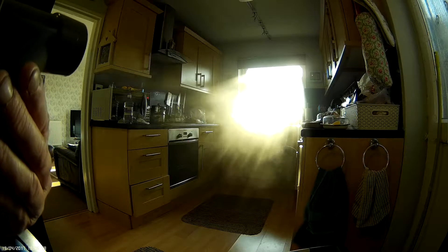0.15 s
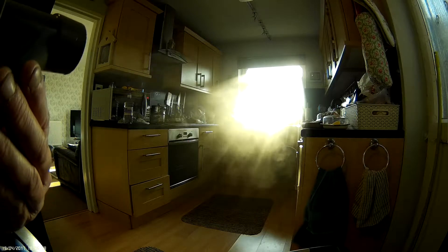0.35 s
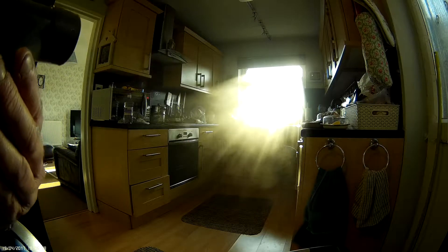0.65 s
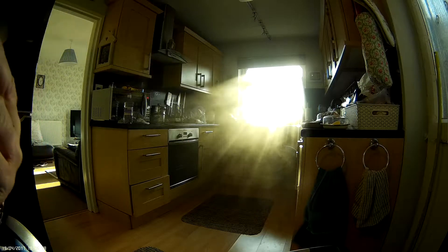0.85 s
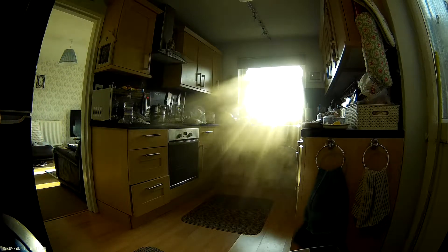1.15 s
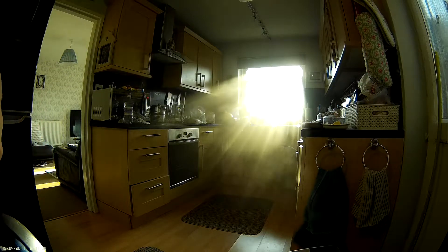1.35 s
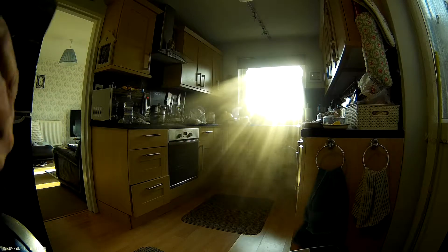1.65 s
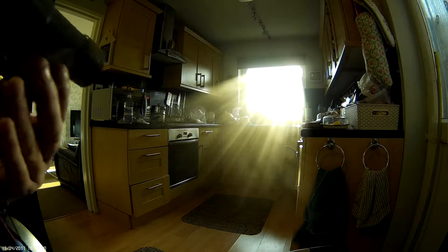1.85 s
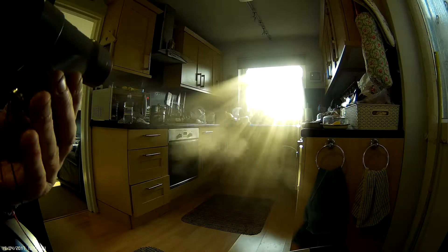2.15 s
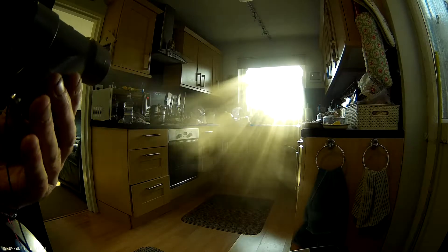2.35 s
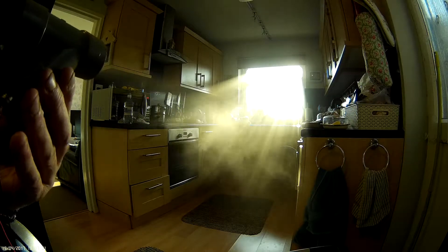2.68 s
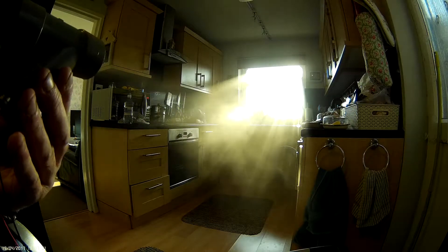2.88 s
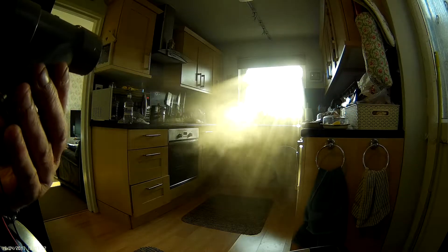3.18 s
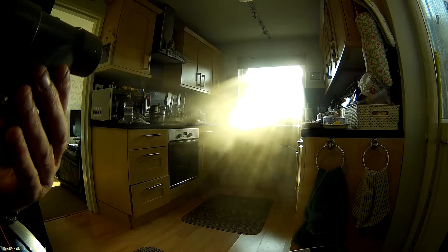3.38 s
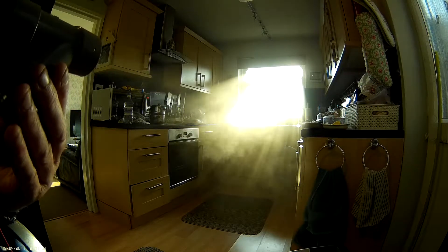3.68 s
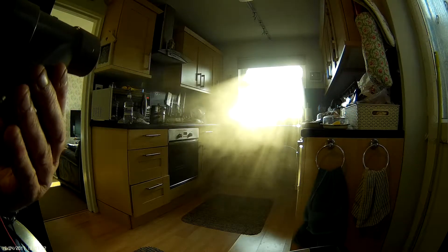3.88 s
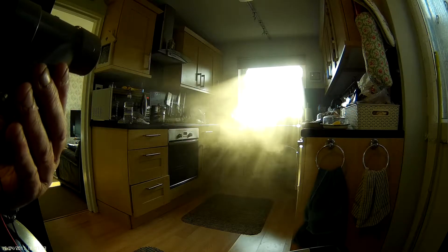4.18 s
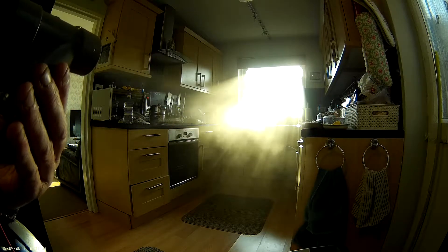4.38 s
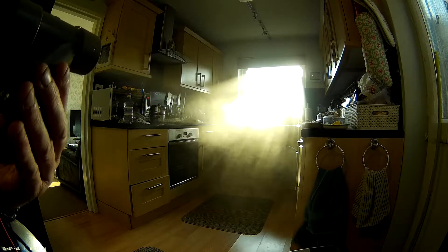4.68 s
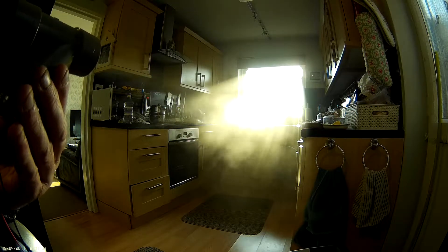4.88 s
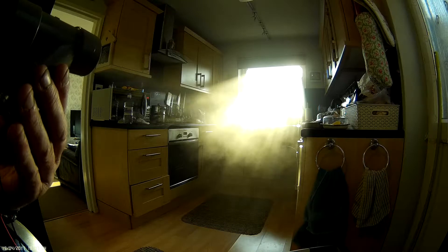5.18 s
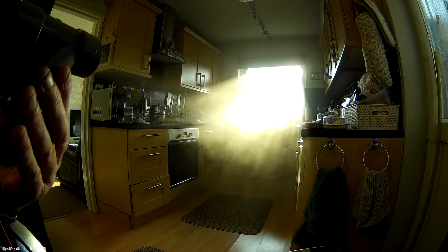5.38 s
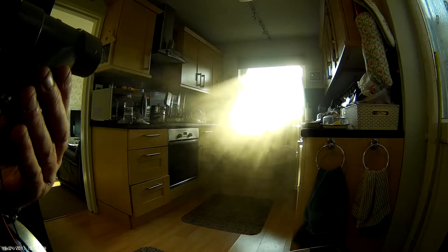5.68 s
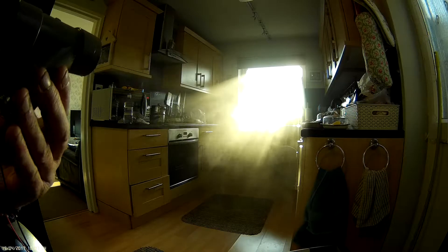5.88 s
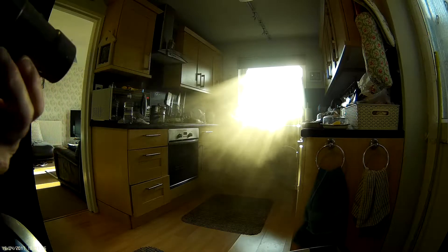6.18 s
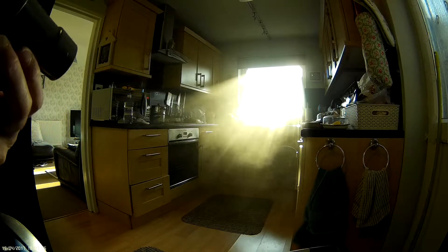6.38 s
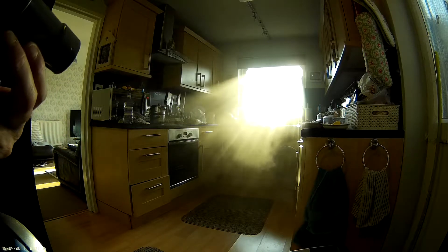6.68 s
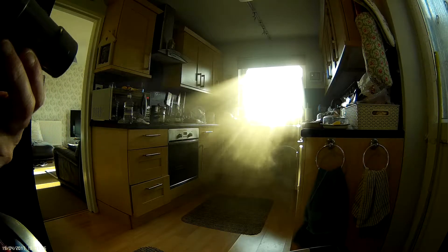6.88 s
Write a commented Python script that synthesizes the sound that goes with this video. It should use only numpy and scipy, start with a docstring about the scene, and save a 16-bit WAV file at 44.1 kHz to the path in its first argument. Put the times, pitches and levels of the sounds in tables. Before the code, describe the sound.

Close hairdryer whoosh and motor whine, briefly dipping, dropping deeper, then winding down to a near-quiet lull with switch clicks before surging back up.

```python
"""A hand-held hairdryer blows in a kitchen, close to the microphone, and is drawn back beside it at first.
Its power is let go three times: a brief dip, a deeper drop, then a long coast almost to rest and a restart.
Air is coloured noise that follows the fan speed; the seven-bladed fan and whine are harmonics of the shaft.
The mains hum while power is on; the switch and plastic handle click as noise bursts through resonances.
Near surfaces echo the air, a short room tail follows fan and handle, and a quiet room lies beneath."""
import sys
import numpy as np
from scipy import signal
from scipy.fft import rfft, irfft, next_fast_len
from scipy.io import wavfile
from scipy.ndimage import map_coordinates

SR = 44100
rng = np.random.default_rng(int(sys.argv[2]) if len(sys.argv) > 2 else 0)


def to_wav(sig):
    """Store sig (one row per channel, or 1-D mono) as 16-bit WAV at the path in sys.argv[1].

    Samples outside -1..1 are clipped; the rate is SR.
    """
    pcm = np.clip(np.atleast_2d(sig), -1, 1) * 32767
    pcm = np.round(pcm).astype(np.int16)
    wavfile.write(sys.argv[1], SR, pcm.T)  # frames by channels


N = 310464
TIME = np.arange(N) / SR  # s


def amp(db):
    """Decibels to gain."""
    return 10 ** (np.asarray(db) / 20)


def unit(x):
    """Scale to rms 1."""
    return x / np.sqrt(np.mean(x ** 2) + 1e-20)


def along(points, hz):
    """Read (frequency [Hz], value) points on a log frequency axis."""
    point_hz, values = np.transpose(points)
    return np.interp(np.log(hz + 1), np.log(point_hz + 1), values)


def curve(rows):
    """Read (time [s], value) points at every sample, holding the end values."""
    times, values = np.transpose(rows)
    return np.interp(TIME, times, values)


def wobble(rate):
    """A smooth random curve with rate knots a second."""
    knots = rng.standard_normal(int(N * rate / SR) + 4)
    return map_coordinates(knots, [TIME * rate])


def filtered(x, response):
    """Pass x through a complex response of frequency."""
    size = next_fast_len(len(x) + SR // 4)
    spectrum = rfft(x, size) * response(np.fft.rfftfreq(size, 1 / SR))
    return irfft(spectrum, size)[:len(x)]


def resonance(f, hz, width):
    """Response of one damped mode, with its width in Hz."""
    return 1j * f * width / (hz * hz - f * f + 1j * f * width)


def noise(spectrum):
    """Coloured noise of rms 1."""
    return unit(filtered(rng.standard_normal(N), lambda f: amp(along(spectrum, f))))


def sounding(hz, width):
    """A resonance kept sounding by turbulence or friction, rms 1."""
    return unit(filtered(rng.standard_normal(N), lambda f: resonance(f, hz, width) ** 2))


def soundings(modes):
    """Sum of sounding resonances at their own levels."""
    return sum(amp(db) * sounding(hz, width) for hz, width, db in modes)


def tone(angle, multiple, rough):
    """A shaft harmonic of rms 1; uneven inflow shakes its strength and phase."""
    shake = 1 + rough * (wobble(55) + 1j * wobble(55))
    return unit(np.real(shake * np.exp(1j * round(multiple) * angle)))


def above(speed, threshold, steepness):
    """A soft gate that opens as the speed passes a threshold."""
    return 1 / (1 + (threshold / speed) ** steepness)


def swells(rows):
    """Gain of bell-shaped swells."""
    return sum(amp(db) * np.exp(-((TIME - middle) / half) ** 2) for middle, half, db in rows)


# Spells with the power on: (on time [s], off time [s], top speed [turns/s],
# spin-up time constant [s], mains hum level [dB])
POWER_RUNS = [(-2, 1.356, 291.3, .13, -46.5), (1.42, 3.618, 276.6, .131, -54.5),
              (3.914, 5.296, 291.9, .127, -55.5), (6.642, 8, 291.3, .29, -59)]


def shaft_speed():
    """Turns a second: the motor pulls towards its top speed while on; bearings and air slow it while off."""
    bearing_drag = 1.884  # share of speed lost a second
    air_drag = 0.0152  # share of speed lost a turn
    speed = np.zeros(N)
    for on, off, top, spin_up, _ in POWER_RUNS:
        start = np.interp(on, TIME, speed)
        time_on = np.clip(TIME - on, 0, off - on)
        driven = top + (start - top) * np.exp(-time_on / spin_up)
        left = np.exp(-bearing_drag * np.maximum(TIME - off, 0))
        coasting = driven * left / (1 + driven * (1 - left) * air_drag / bearing_drag)
        speed = np.where(TIME < on, speed, coasting)
    return speed


def surge():
    """The air overshoots after each switch-on: a hump from 0 to 1 and back."""
    peak_s = 0.31  # after switch-on
    ages = [np.maximum(TIME - on, 0) / peak_s for on, *_ in POWER_RUNS]
    return sum((age * np.exp(1 - age)) ** 4 for age in ages)


# Dryer drawn back beside the microphone: (time [s], place [0 held out - 1 right back])
DRAWN_BACK = [(0, 0), (.4, 0.45), (.6, 0.4), (.85, .85), (1.32, 0.88), (1.43, 0.34), (1.8, 0.56),
              (2.1, 0.18)]


def loudness(speed):
    """The law that gives a sound's gain from fan speed, surge and the dryer's place."""
    decades = np.log10(speed / 291)  # from full speed, turns a second
    overshoot, back = surge(), curve(DRAWN_BACK)
    turning = above(speed, threshold=25.6, steepness=8.8)  # slower than this the fan stalls

    def gain(full_db, speed_db, surge_db, back_db):
        """Level at full speed, dB per tenfold speed, dB added by the surge and by drawing back."""
        level_db = full_db + speed_db * decades + surge_db * overshoot + back_db * back
        return turning * amp(level_db)
    return gain


# Where the nozzle points: (time [s], aim [0 held aside - 1 held ahead])
NOZZLE_AIM = [(0, 0.071), (1.3, 0.022), (1.7, 0.32), (2.1, 1), (2.7, 0.99), (5.9, 0.99), (6.6, 0.31),
              (7.04, 0.88)]


def jet(aside, ahead, flutter_db):
    """Turbulent air whose colour follows the aim of the nozzle and whose level flutters."""
    aim = np.clip(curve(NOZZLE_AIM), 0, 1)
    blend = np.sqrt(1 - aim) * noise(aside) + np.sqrt(aim) * noise(ahead)
    return blend * amp(flutter_db * wobble(45))


# Narrow resonances of the room, which colour the rush, before the gain set in air():
# (frequency [Hz], width [Hz], level [dB])
ROOM_RINGS = [(648, 43, -26.5), (762, 36, -21.5), (1006, 42, -17.5), (1102.6, 36, -18), (1257, 68, -18),
              (1360, 26, -16), (1464, 36, -22), (1513, 62, -18.5), (1657, 72, -19), (2063, 31, -26.5)]


def rings():
    """Turbulence keeps narrow room resonances sounding, which colours the rush."""
    return soundings(ROOM_RINGS)


# Relative air colours, nozzle aside and ahead: (frequency [Hz], density [dB per Hz])
ROAR_ASIDE = [(24, -66), (55, -36), (92, -21.5), (160, -14), (240, -13), (330, -13), (475, -6), (608, 0),
              (767, 0), (916, -12.5), (1050, 1), (1360, -20), (2300, -120)]
ROAR_AHEAD = [(24, -53), (55, -30), (92, -30), (160, -19), (260, -17.5), (380, -11), (490, -9.5), (560, -4),
              (660, -4.5), (750, 0), (890, -4.5), (1050, -2), (1360, -14), (2300, -120)]
RUSH_ASIDE = [(530, -55), (900, -11), (933, -20), (1010, -12.5), (1130, 1.5), (1330, -0.5), (1460, 0.5),
              (1960, 2), (2350, -10), (2490, -10), (2660, -6), (2870, -9.5), (3190, -9.5), (3700, -21.5),
              (4810, -22), (8140, -120)]
RUSH_AHEAD = [(530, -45.5), (900, -13), (1070, -9.5), (1160, -9.5), (1290, -8), (1530, -13), (1650, -9),
              (1870, -1), (1980, 1), (2320, -13), (2690, -10.5), (2900, -16.5), (3150, -14.5), (3490, -29),
              (3700, -28), (4810, -25), (8140, -120)]
HISS_ASIDE = [(2000, -14.5), (3400, -10), (3790, -12.5), (4780, 1), (5260, -7), (5430, -1), (6380, -2),
              (7160, 3.5), (7780, -5), (8450, -2.5), (9990, -9), (11100, -15), (12400, -14), (13300, -21.5),
              (15800, -52)]
HISS_AHEAD = [(2000, -35), (3400, -9), (3770, -11.5), (4250, -8.5), (4720, -2), (5090, -7), (5610, -4),
              (6420, -8), (6930, .5), (7200, 1.5), (8080, -6), (9370, -8), (10900, -18), (12300, -15.5),
              (15100, -40), (15800, -45)]
# Levels of midrange and treble, on top of the fan's law: (time [s], level [dB])
MIDRANGE = [(1.3, -.5), (1.39, -2), (1.48, 0), (1.75, -1), (2.0, .5), (3.2, 0), (3.7, 1), (3.89, 0),
            (4.08, 2), (4.9, -1), (5.45, 1.5), (5.66, -4), (5.95, -2.5), (6.7, -2.5), (6.9, 2.5)]
TREBLE = [(1.33, 0), (1.4, -1), (1.6, 0), (2.3, -.5), (3.1, 0.4), (3.5, 2), (3.8, 0), (4.3, 1.5),
          (5.3, -.5), (6.9, -1)]


def air(speed):
    """A low roar, the rush in the housing and the hiss at the nozzle, all trailing the fan."""
    lag_s = 0.011
    gain = loudness(np.interp(TIME - lag_s, TIME, speed))
    roar = jet(ROAR_ASIDE, ROAR_AHEAD, flutter_db=1.1)
    roar *= gain(full_db=-26, speed_db=21.5, surge_db=1, back_db=4)
    rush = jet(RUSH_ASIDE, RUSH_AHEAD, flutter_db=0.6)
    rush *= gain(full_db=-16, speed_db=33.5, surge_db=2, back_db=-1.5)
    hiss = jet(HISS_ASIDE, HISS_AHEAD, flutter_db=0.41)
    hiss *= gain(full_db=-23, speed_db=37.5, surge_db=2, back_db=0.5)
    ringing = gain(full_db=-16, speed_db=23, surge_db=2.5, back_db=-2) * rings()
    return roar + amp(curve(MIDRANGE)) * (rush + ringing) + amp(curve(TREBLE)) * hiss


# Near surfaces, the door frame and cupboards: (delay [s], level [dB])
EARLY_ECHOES = [(.0083, -21.5), (.0118, -19.5), (.0173, -18.5), (0.024, -19.5), (0.0314, -16.5)]


def walls(x):
    """Early echoes comb the sound finely; the scaling offsets the power they add."""
    power = 1 + sum(amp(db) ** 2 for _, db in EARLY_ECHOES)

    def comb(f):
        return 1 + sum(amp(db) * np.exp(-2j * np.pi * f * delay) for delay, db in EARLY_ECHOES)
    return filtered(x, comb) / np.sqrt(power)


# Motor whine, before the gain set in fan(): (multiple of the shaft [-], level [dB])
MOTOR_WHINE = [(31, -29), (35, -33), (41, -44), (43, -46), (44, -43), (45, -45), (46, -46), (47, -48)]
# Blade overtones at low speed, against the blade tone: (multiple of the shaft [-], level [dB])
BLADE_OVERTONES = [(14, 0.5), (21, -3), (28, -12)]
# A small fan radiates low notes poorly, its housing favours some: (frequency [Hz], level [dB])
RADIATION = [(170, -42), (265, -17), (390, -0.5), (560, 1), (720, -1), (950, -8.5), (1300, -0.5),
             (1600, 3.5), (1950, 0)]
# Third blade harmonic whistling in the grille: (time [s], level [dB])
GRILLE_WHISTLE = [(1.3, -57), (1.62, -30.5), (1.85, -25), (2.02, -34), (2.3, -33.5), (2.9, -38.5),
                  (3.55, -31), (4.22, -35), (5.05, -35.5), (5.3, -48)]


def fan(speed, gain):
    """Unbalance, blade tones, motor whine and grille whistle, all locked to the shaft."""
    blades = 7
    unsteady_speed = speed * (1 + 0.00084 * wobble(14))
    angle = 2 * np.pi * np.cumsum(unsteady_speed) / SR

    unbalance = gain(full_db=-41.5, speed_db=87, surge_db=3.5, back_db=4) * tone(angle, 1, rough=0.31)

    # at low speed each blade makes a sharper puff, rich in overtones
    slow = np.clip(1 - speed / 100, 0, 1)  # grows in below 100 turns a second
    overtones = sum(amp(db) * tone(angle, k, rough=0.25) for k, db in BLADE_OVERTONES)
    puffs = tone(angle, blades, rough=0.16) + slow * overtones
    puffs *= gain(full_db=-23.5, speed_db=21, surge_db=1.5, back_db=-10.5)
    puffs = filtered(puffs, lambda f: amp(along(RADIATION, f)))

    whine = sum(amp(db) * tone(angle, k, rough=0.3) for k, db in MOTOR_WHINE)
    whine *= gain(full_db=-19, speed_db=36, surge_db=1, back_db=0)

    whistle = amp(curve(GRILLE_WHISTLE)) * tone(angle, 3 * blades, rough=0.14)
    whistle *= above(speed, threshold=255, steepness=40)  # it speaks only near full speed
    return unbalance + puffs + whine + whistle


def hum():
    """Rectified mains shake the motor at 100 Hz while the power is on."""
    fade_s, hum_hz = 0.033, 100
    level = np.zeros(N)
    for on, off, _, _, db in POWER_RUNS:
        level += amp(db) * np.clip(np.minimum(TIME - on, off - TIME) / fade_s, 0, 1)
    return level * tone(2 * np.pi * hum_hz * TIME, 1, rough=0.45)


# Brush scrape of the motor, before the gain set in brushes():
# (frequency [Hz], width [Hz], level [dB])
BRUSH_SCRAPE = [(2900, 350, -53.5), (4150, 520, -58), (11840, 700, -64), (13200, 1200, -70)]


def brushes(gain):
    """Friction of the brushes keeps a thin scrape going, uncovered when the air dies down."""
    return gain(full_db=0.5, speed_db=0, surge_db=4, back_db=0) * soundings(BRUSH_SCRAPE)


# Relative colour of quiet room and microphone hiss: (frequency [Hz], density [dB per Hz])
QUIET_ROOM = [(25, -10), (60, -5), (110, -8), (165, 3), (260, -5.5), (600, -4), (1400, -13), (2200, -5.5),
              (3700, -14.5), (6200, -10.5), (7200, 0), (9000, -22), (11900, -14), (14000, -31)]
# Its level, which sinks in the lull and rises at the restart: (time [s], level [dB])
BACKGROUND_LEVEL = [(6.0, -51.5), (6.18, -51), (6.35, -53), (6.52, -55), (6.8, -48)]


def background():
    """Quiet room and microphone hiss as coloured noise."""
    return amp(curve(BACKGROUND_LEVEL)) * noise(QUIET_ROOM)


# Decay of the kitchen: (frequency [Hz], time to fall 60 dB [s])
KITCHEN_DECAY = [(200, 0.29), (2000, 0.2), (10000, 0.077)]


def kitchen(x):
    """The room's short tail is decaying noise, duller as it dies."""
    hz, times, bins = signal.stft(rng.standard_normal(SR // 2), SR, nperseg=256)
    decay = amp(-60 * times / along(KITCHEN_DECAY, hz)[:, None])
    tail = signal.istft(bins * decay, SR, nperseg=256)[1]
    return signal.fftconvolve(x, tail / np.linalg.norm(tail))[:N]


def burst(response, t60, tail_db, tail_t60):
    """A sharp contact and its brief rattle through a body, peak 1."""
    t = np.arange(SR // 8) / SR
    fade = amp(-60 * t / t60) + amp(tail_db - 60 * t / tail_t60)
    ring = filtered(rng.choice([-1, 1], len(t)) * fade, response)
    return ring / np.abs(ring).max()


# Modes of the plastic shell, relative: (frequency [Hz], width [Hz], level [dB])
SHELL_MODES = [(695, 240, 1.5), (1180, 160, 1), (1930, 460, 5.5), (2400, 470, -9.5)]
# Switch and handle contacts, before the trims in clicks():
# (time [s], snap level [dB], snap frequency [Hz], knock level [dB])
HANDLE_CLICKS = [(3.909, -24, 5070, -33), (5.7503, -31, 5170, -35), (5.7985, -31, 4900, -30.5),
                 (6.2117, -29, 4870, -25), (6.3145, -58, 5000, -49), (6.335, -45, 5400, -41.5),
                 (6.362, -52, 5000, -47), (6.3774, -31, 5040, -36), (6.3866, -23, 7450, -42),
                 (6.3861, -22.5, 5460, -57), (6.451, -58, 5000, -51), (6.597, -48, 5000, -41),
                 (6.6044, -28, 4780, -35), (6.6675, -43, 5000, -32), (6.7593, -22.5, 5700, -37)]


def clicks():
    """The switch snaps brightly and knocks the hollow shell."""
    snap_trim_db, knock_trim_db = 2.0, 4.5
    out = np.zeros(N + SR)

    def shell(f):
        # neighbouring modes move in opposite phase
        return sum((-1) ** k * amp(db) * resonance(f, hz, width)
                   for k, (hz, width, db) in enumerate(SHELL_MODES))

    for s, snap_db, snap_hz, knock_db in HANDLE_CLICKS:
        def spring(f):
            return resonance(f, snap_hz, 650) - amp(-10.5) * resonance(f, 8400, 2000)
        snap = burst(spring, t60=0.0091, tail_db=-19, tail_t60=0.036)
        knock = burst(shell, t60=0.017, tail_db=-14, tail_t60=0.084)
        contact = amp(snap_db + snap_trim_db) * snap + amp(knock_db + knock_trim_db) * knock
        out[round(s * SR):][:len(contact)] += contact
    return out[:N]


# Two swells of a low housing note: (middle time [s], half length [s], level [dB])
HOUSING_DRONES = [(5.33, .2, -48.5), (6.82, 0.12, -55)]


def drone():
    """A low note of the housing swells twice."""
    return swells(HOUSING_DRONES) * sounding(hz=145, width=15)


# The hand shifts on the handle: (middle time [s], half length [s], level [dB])
HAND_RUBS = [(6.31, 0.13, -58.5), (6.645, .03, -52)]


def rub():
    """Friction of the hand keeps the shell's modes sounding."""
    return swells(HAND_RUBS) * unit(soundings(SHELL_MODES))


def scene():
    """Dryer and room, heard at one microphone point, the same on both channels."""
    speed = shaft_speed()
    gain = loudness(speed)
    rotor, handle = fan(speed, gain), clicks()
    dryer = walls(air(speed)) + rotor + hum() + brushes(gain) + handle + drone() + rub()
    room = kitchen(amp(-13.5) * rotor + amp(-9.5) * handle)
    mono = dryer + room + background()
    return np.array([mono, mono])


def record(dry):
    """The microphone channel rounds off the highest peaks and keeps nothing above its band limit."""
    ceiling, top_hz = 0.78, 15700  # ceiling as a share of full scale
    rounded = dry / (1 + np.abs(dry / ceiling) ** 6) ** (1 / 6)
    return np.array([filtered(side, lambda f: f < top_hz) for side in rounded])


dry = scene()
out = record(dry)
to_wav(out)
```